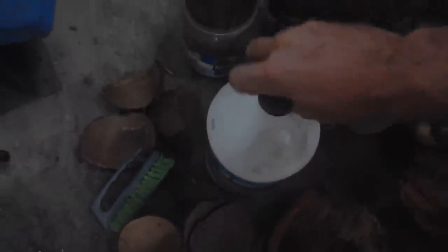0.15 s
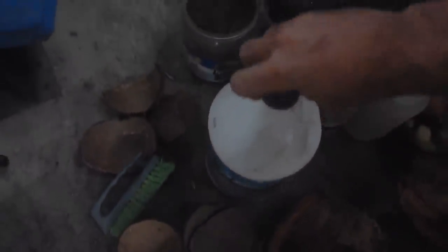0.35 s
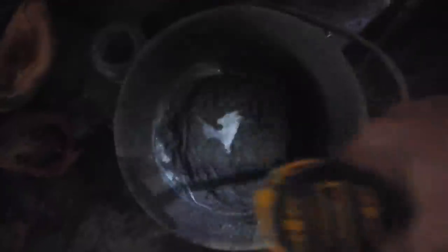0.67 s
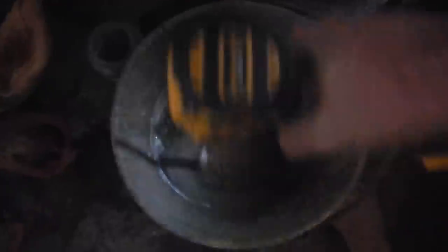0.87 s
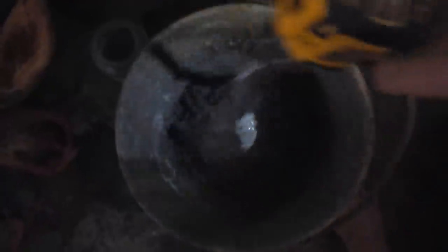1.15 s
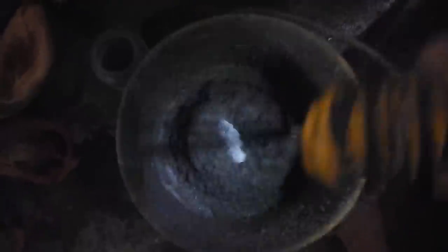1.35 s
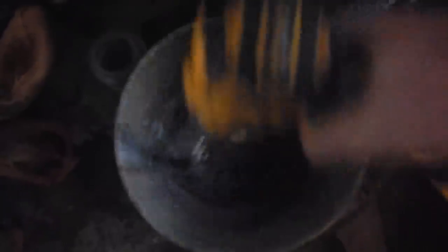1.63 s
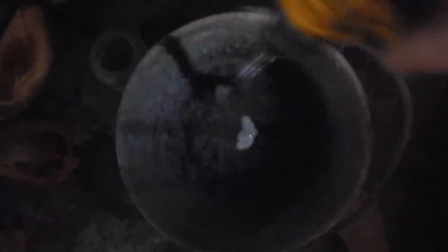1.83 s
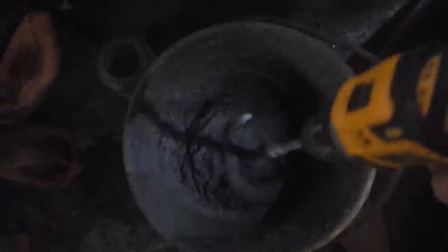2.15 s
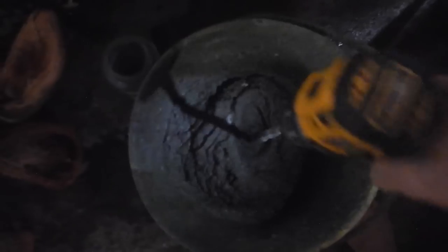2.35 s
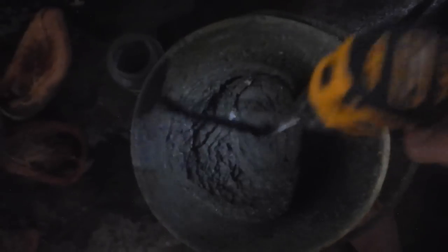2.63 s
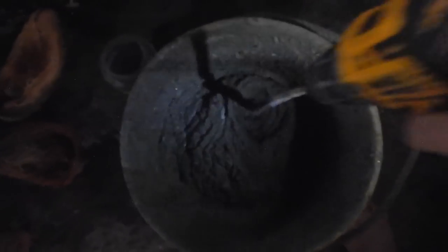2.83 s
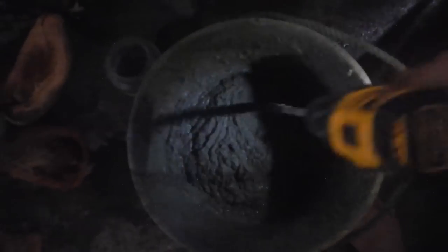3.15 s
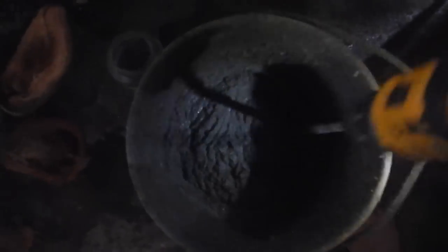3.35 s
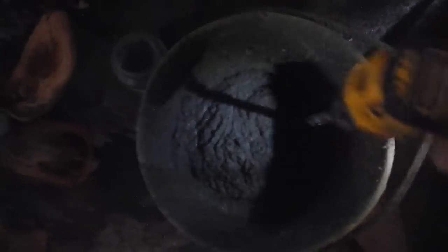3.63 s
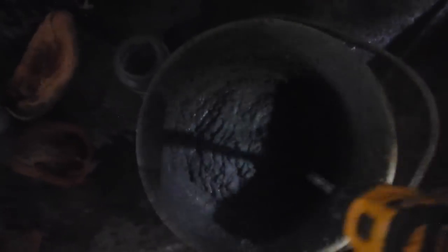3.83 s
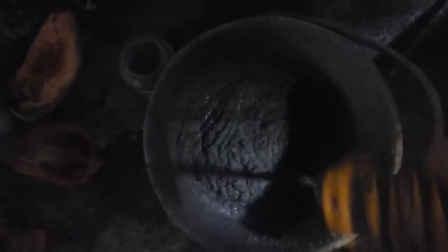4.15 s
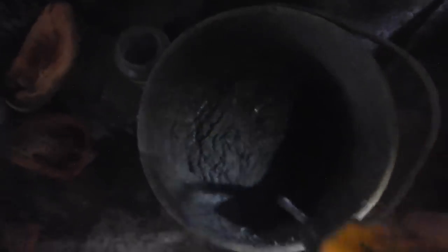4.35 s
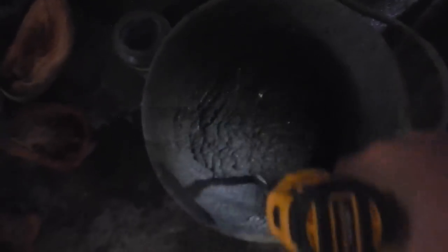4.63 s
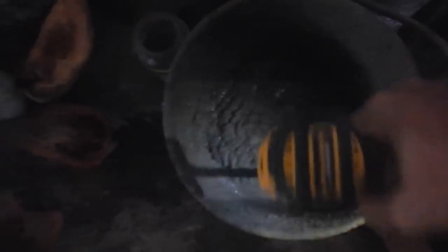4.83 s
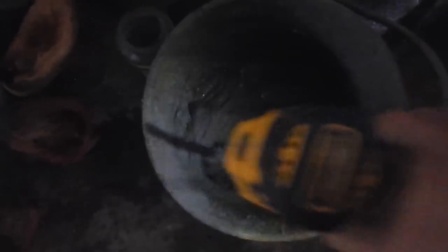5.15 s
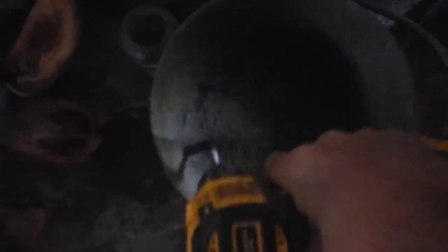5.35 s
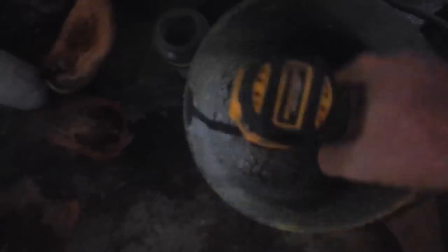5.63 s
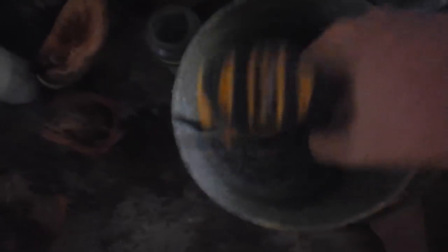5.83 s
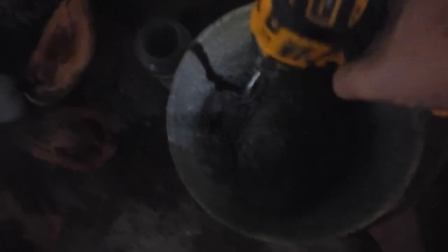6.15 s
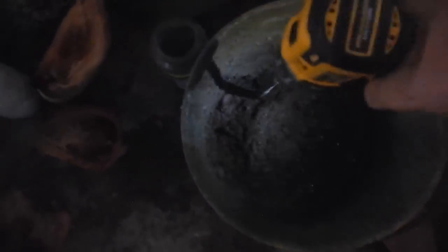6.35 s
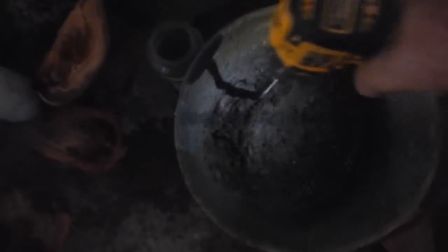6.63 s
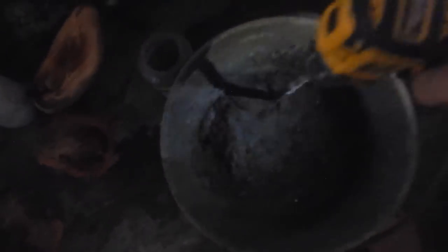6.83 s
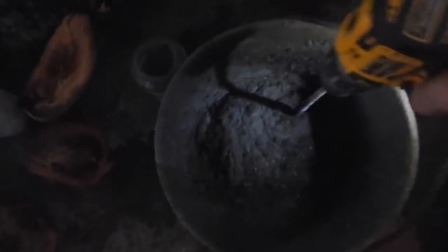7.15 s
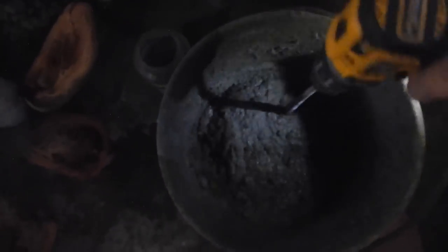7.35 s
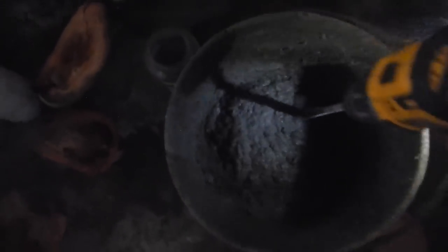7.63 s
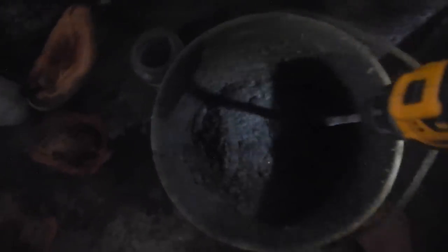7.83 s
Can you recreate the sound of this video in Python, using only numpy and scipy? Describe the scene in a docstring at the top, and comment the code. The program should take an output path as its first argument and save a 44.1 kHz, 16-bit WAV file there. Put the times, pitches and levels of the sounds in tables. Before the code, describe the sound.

Close stereo microphones pick up short, dry plastic knocks over a faint room murmur. Suddenly a power drill fills the sound, a bright, gritty whirr with shifting whines and a thin whistle. A mixing paddle drags through heavy wet mortar, bumping the bucket with dull thuds and smacking lumps. The motor holds its speed, wavers slightly, sags briefly near the end under load, recovers and keeps running.

```python
"""A cordless drill, close by, stirs cement mortar in a bucket: filtered noise is the rush of fan and gears,
sines locked to the rotor whine at a governed speed that hunts and once sags under load.
Random impacts ring the bucket's modes as the paddle churns; swelling noise squelches and slaps.
Before it, in a small workshop's murmur, a plastic cup knocks on a container: clicks ring both sets of modes."""
import sys
import numpy as np
from scipy import signal
from scipy.fft import rfft, irfft
from scipy.io import wavfile
from scipy.ndimage import uniform_filter1d

SR = 44100
rng = np.random.default_rng(int(sys.argv[2]) if len(sys.argv) > 2 else 0)


def master_out(mix):
    """Clip the mix to full scale and print it as 16-bit PCM to the path in sys.argv[1]."""
    frames = np.transpose(np.atleast_2d(mix))
    ceiling = np.clip(frames, -1, 1)
    pcm = np.round(ceiling * 32767).astype(np.int16)
    wavfile.write(sys.argv[1], SR, pcm)


N = 351918
TIME, FREQS = np.arange(N) / SR, np.fft.rfftfreq(N, 1 / SR)


def from_db(db):
    """Decibels to amplitude gain."""
    return 10 ** (np.asarray(db) / 20)


def rms_one(x):
    """Scale to unit power."""
    return x / np.sqrt(np.mean(x ** 2) + 1e-20)


def in_time(rows):
    """Interpolate each column of a time curve at every sample."""
    s, *columns = np.transpose(rows)
    return [np.interp(TIME, s, column) for column in columns]


def over_hz(points):
    """Interpolate a short spectrum on a log-frequency axis."""
    hz, value = np.transpose(points)
    return np.interp(np.log(FREQS + 1), np.log(hz), value)


def drift(rate_hz):
    """Low-passed random signal of rms 1."""
    spectrum = rfft(rng.standard_normal(N)) / (1 + (FREQS / rate_hz) ** 2)
    return rms_one(irfft(spectrum, N))


def panned(pan_db):
    """Left and right gains for a left-right level difference."""
    return from_db(np.array([[1], [-1]]) * pan_db / 2)


def noise(spectrum_db):
    """Coloured stereo noise of rms 1; left-right likeness varies with frequency."""
    # Likeness of the channels: (frequency [Hz], correlation [0-1])
    likeness = [(60, 0.66), (600, 0.96), (1500, 0.97), (3100, 0.88), (7000, 0.79), (15000, 1)]
    mid, side = rfft(rng.standard_normal((2, N)))
    alike = np.clip(over_hz(likeness), 0, 1)
    stereo = np.sqrt(1 + alike) * mid + np.sqrt(1 - alike) * side * [[1], [-1]]
    return rms_one(irfft(from_db(over_hz(spectrum_db)) * stereo, N))


def ring(force, hz, t60_s):
    """Two-pole resonator: a unit click starts a decaying sine of height 1."""
    radius = from_db(-60 / (t60_s * SR))
    angle = 2 * np.pi * hz / SR
    poles = [1, -2 * radius * np.cos(angle), radius * radius]
    return signal.lfilter([0, np.sin(angle)], poles, force + 1e-18)


def clicks(times_s, levels_db):
    """One impulse per event."""
    out = np.zeros(N)
    out[np.round(np.asarray(times_s) * SR).astype(int)] = from_db(levels_db)
    return out


def fade(hits, t60_s, rise_s):
    """Envelope that swells at each hit and dies away; overlapping hits add in power."""
    power = signal.lfilter([1], [1, -from_db(-120 / (t60_s * SR))], hits ** 2 + 1e-18)
    slow = np.exp(-1 / (rise_s * SR))
    return signal.lfilter([1 - slow], [1, -slow], np.sqrt(power))


def low_cut(x, hz):
    """Second-order high-pass, as small objects radiate little bass."""
    return signal.sosfilt(signal.butter(2, hz, "high", fs=SR, output="sos"), x)


def cup():
    """Knocks ring cup and container, duller if soft; the rim cracks, grit scuffs, wall and room answer."""
    # Knocks: (time [s], strength [dB], contact brightness [Hz], ring length [factor on t60],
    # scuff [dB re strength], container [dB re strength])
    knocks = [(0.026, -34.5, 3500, 0.95, 2.5, 14), (0.0433, -31, 3000, 0.84, 4, 17),
              (0.054, -28, 1800, 1.4, -1, 12), (.066, -30, 2500, 1, 4, 8),
              (0.0747, -6, 1700, 1.33, -10.5, -4), (0.1028, -10.5, 1470, 1.1, -10.5, 3),
              (0.2627, -2, 4500, 0.76, -15, -5.5), (0.319, -7.5, 5500, 0.75, -6.5, -4),
              (.5185, -25, 4700, 0.65, 0, 18.5)]
    # Cup modes: (frequency [Hz], relative level [dB], t60 [s])
    cup_modes = [(1425, -4, 0.035), (1625, -2, 0.021), (1830, -0.5, 0.014), (2250, -6.5, 0.0081),
                 (2800, -3, 0.0075), (3560, -11, 0.018), (4800, -6.5, 0.011), (8070, -15, 0.016),
                 (11350, -15, 0.0061)]
    # Modes of the container under it: (frequency [Hz], relative level [dB], t60 [s])
    container_modes = [(127, -22, 0.11), (496, -31, 0.039), (720, -22, 0.061), (955, -14.5, 0.037)]
    # Snap of the plastic: (frequency [Hz], relative density [dB per Hz])
    crack_db = [(800, -14), (1700, 6.5), (2250, 9.5), (2800, -8), (4000, -4), (5600, -6), (7000, -13),
                (8000, -3), (9300, -23), (12000, -21), (15000, -50)]
    # Gritty contact and its echo: (frequency [Hz], relative density [dB per Hz])
    scuff_spectrum_db = [(60, -17), (130, 6), (300, -6), (800, 2), (1200, -7), (1650, 7), (3000, -8.5),
                         (5000, -10.5), (6500, -19), (8200, -16.5), (12000, -36), (15000, -50)]
    knocking, size = np.zeros(N), SR // 4
    for s, level_db, bright_hz, length, _, container_db in knocks:
        soft = np.exp(-2 * np.pi * bright_hz / SR)
        force = from_db(level_db) * (1 - soft) * soft ** np.arange(size)
        at = round(s * SR)
        for modes, gain_db in ((cup_modes, -2.5), (container_modes, container_db - 3.5)):
            # chance: each knock excites each mode differently, 1 dB spread
            strengths = from_db(gain_db + rng.standard_normal(len(modes)))
            for k, (hz, db, t60_s) in enumerate(modes):
                gain = (-1) ** k * strengths[k] * from_db(db)
                knocking[at:at + size] += gain * ring(force, hz, t60_s * length)

    s, level_db, bright_hz, _, scuff_db, _ = np.transpose(knocks)
    hardness_db = 20 * np.log10(bright_hz / bright_hz.max())
    crack_hits = clicks(s - .0005, level_db + hardness_db)
    crack = from_db(-1.5) * fade(crack_hits, t60_s=0.0088, rise_s=0.00068) * noise(crack_db)
    scuff_hits = clicks(s, level_db + scuff_db)
    scuff = from_db(-5) * fade(scuff_hits, t60_s=0.056, rise_s=0.00051) * noise(scuff_spectrum_db)
    room_hits = clicks(s, level_db)
    echo = from_db(-33.5) * fade(room_hits, t60_s=0.32, rise_s=.004) * noise(scuff_spectrum_db)
    wall_delay_s, wall_db = 0.015, -23
    wall = from_db(wall_db) * np.interp(TIME - wall_delay_s, TIME, knocking)
    return low_cut(knocking + crack + scuff + wall + echo, hz=90) * panned(pan_db=0.7)


def room():
    """Steady coloured noise for the room's murmur."""
    # Murmur: (frequency [Hz], relative density [dB per Hz])
    murmur_db = [(20, -20), (52, 8), (85, -3), (260, -0.5), (400, -4.5), (1700, -8), (3000, -16),
                 (3800, -12), (5000, -23.5), (7000, -24.5), (8300, -18.5), (10000, -30), (15000, -37)]
    return from_db(-50.5) * noise(murmur_db)


def motor_turns():
    """Rotor turns so far: integral of governed speed, swings that swell and fade around each hunt, tremor."""
    # Speed, held by the governor except under heavy load: (time [s], speed [turns/s])
    speed_curve = [(6.565, 409.6), (6.585, 381), (6.612, 369), (6.66, 380), (6.75, 378.5), (6.93, 389),
                   (7.11, 388), (7.17, 378), (7.243, 349), (7.3, 383), (7.317, 409.6)]
    # The paddle snags and the governor hunts: (centre [s], swing [turns/s], Gaussian half length [s])
    hunts = [(2.972, -9, .025), (3.454, -5, .025), (3.947, -6, .025), (4.673, 4.5, .12),
             (5.274, -5.5, .025), (5.483, -4, .12), (6.441, -5, .1), (7.462, -7.5, .09)]
    hunt_hz = 17
    speed, = in_time(speed_curve)
    for s, swing, length_s in hunts:
        envelope = np.exp(-((TIME - s) / length_s) ** 2)
        speed = speed + swing * envelope * np.cos(2 * np.pi * hunt_hz * (TIME - s))
    tremor = .75 * drift(rate_hz=28)  # turns/s
    return np.cumsum(speed + tremor) / SR


def tone(turns, order, flutter_db):
    """Sine at a multiple of rotor speed; play in the teeth jitters the angle, so high orders rasp more."""
    jitter_turns = .002 * drift(rate_hz=130)
    cycles = order * (turns + jitter_turns) + rng.random()
    return np.sqrt(2) * np.sin(2 * np.pi * cycles) * from_db(flutter_db * drift(rate_hz=34))


def whine(rows, turns, order, flutter_db):
    """Tone that swells and fades as the hand moves; steadiest at its loudest, fluttering as it fades."""
    rounding_s = 0.037
    level_db = uniform_filter1d(in_time(rows)[0], round(rounding_s * SR))
    unsteady = np.clip(from_db((level_db.mean() - level_db) / 2), 0, 1.2)
    gain = from_db(level_db + .5 * drift(rate_hz=5))
    return gain * tone(turns, order, flutter_db * unsteady)


def whines(turns):
    """Five moving tones of the motor, each at a fixed multiple of rotor speed."""
    # Main whine: (time [s], level [dB])
    main_whine = [(0.7, -36), (1.0, -45), (1.33, -41.5), (1.6, -33), (1.84, -47.5), (2.11, -41),
                  (2.62, -58), (2.71, -40), (3.04, -53), (3.13, -29.5), (3.34, -47.5), (3.67, -37.5),
                  (3.97, -47.5), (4.39, -34.5), (4.63, -43), (5.08, -36), (5.47, -44), (5.92, -36),
                  (6.46, -52), (6.6, -55), (6.73, -37.5), (6.93, -53), (7.09, -55), (7.16, -42),
                  (7.21, -54.5), (7.78, -36), (7.96, -50)]
    # Whine an octave above: (time [s], level [dB])
    high_whine = [(0.7, -55), (0.94, -48), (2.35, -54.5), (2.44, -38.5), (2.86, -58), (3.04, -35),
                  (3.19, -56), (3.58, -38), (3.7, -49), (4.24, -45.5), (4.36, -68), (4.63, -42.5),
                  (5.2, -47.5), (5.32, -36), (5.5, -50.0), (5.74, -37.0), (5.92, -41.5), (6.01, -61),
                  (6.49, -37), (6.64, -51), (7.09, -55.0), (7.36, -38.5), (7.51, -46), (7.96, -46.5)]
    # Thin top whistle: (time [s], level [dB])
    whistle = [(0.7, -60), (0.88, -67), (1.24, -41.5), (1.51, -57), (1.93, -44.5), (2.86, -46.5),
               (3.28, -53), (3.4, -40.5), (3.55, -59), (3.73, -46.5), (4.15, -61), (4.36, -41.5),
               (4.63, -55.5), (5.95, -55.0), (6.43, -48), (7.06, -56), (7.18, -43.5), (7.96, -42)]
    # Rotor drone: (time [s], level [dB])
    drone = [(0.7, -52.5), (2.56, -55), (4.42, -53), (4.9, -66.0), (5.11, -51.5), (6.52, -53),
             (6.64, -66.0), (6.79, -53.5), (7.21, -57), (7.96, -48)]
    # Lower octave of the drone: (time [s], level [dB])
    low_drone = [(0.7, -64), (2.92, -62.5), (2.95, -68), (6.1, -65), (7.42, -76), (7.96, -63.5)]
    # Per tone, in that sequence: (multiple of rotor speed)
    orders = (8, 16.04, 23, 4, 2)
    # Per tone: (flutter spread at mean level [dB])
    flutters_db = (2, 3.6, 2.8, 0.89, 1.2)
    # Per tone: (left-right offset from the drill's position [dB])
    pans_db = (-.5, -1, 0.32, 0, 0)
    levels = (main_whine, high_whine, whistle, drone, low_drone)
    return sum(whine(level, turns, order, flutter_db) * panned(pan_db)
               for level, order, flutter_db, pan_db in zip(levels, orders, flutters_db, pans_db))


def hum(turns):
    """Weaker tones of rotor and gears at fixed mean levels."""
    # Per tone: (multiple of rotor speed)
    orders = (1, 4.6, 7, 9, 10.58, 11.3, 14.8)
    # Per tone: (level [dB])
    levels_db = (-80.5, -62.5, -64, -77, -72, -62, -73)
    return sum(from_db(db) * tone(turns, order, flutter_db=4.8)
               for order, db in zip(orders, levels_db))


def bucket_echo(x, delay_s, sway, share):
    """The bucket returns the sound over a path that shifts as the drill moves: a changing hollow colour."""
    late_s = TIME - delay_s * (1 + sway * np.tanh(drift(rate_hz=0.96)))
    echo = np.array([np.interp(late_s, TIME, channel) for channel in x])
    return rms_one(x + share * echo)


def rush(turns, body_db, hiss_db):
    """Fan and gear noise in two bands, throbbing slightly with each paddle turn."""
    # Body: (frequency [Hz], relative density [dB per Hz])
    body_spectrum_db = [(40, -27.5), (120, -51), (400, -24.5), (700, -17.5), (950, -7), (1100, -11),
                        (1500, -4.5), (1900, 1.15), (2250, 0.1), (2900, 2), (3750, 3.5), (4300, -3.5),
                        (5500, -4.5), (8000, -30)]
    # Hiss: (frequency [Hz], relative density [dB per Hz])
    hiss_spectrum_db = [(1000, -45), (2500, -16), (4600, -0.5), (5500, 0), (6500, 6.5), (8100, 6.5),
                        (9000, 0), (9700, -1), (10300, -8.5), (11700, -10.5), (14000, -27), (16000, -44)]
    rotor_turns_per_paddle_turn = 22.5
    paddle_turn = np.sin(2 * np.pi * turns / rotor_turns_per_paddle_turn)
    throb = from_db(.3 * paddle_turn + .5 * drift(rate_hz=40))
    body = bucket_echo(noise(body_spectrum_db), delay_s=0.001995, sway=0.28, share=0.18)
    hiss = noise(hiss_spectrum_db)
    return throb * (from_db(body_db) * body + from_db(hiss_db) * hiss)


def drill():
    """Tones locked to the rotor over the rush of fan and gears, moving together in the stereo image."""
    # Body of the rush, used about its mean: (time [s], level [dB])
    body_level = [(0.7, -42), (0.98, -41.5), (1.25, -43), (1.71, -41), (1.85, -43), (2.41, -43),
                  (3.85, -44.5), (3.91, -43), (5.81, -42), (6.8, -45), (7.28, -43.5), (7.32, -41),
                  (7.75, -43.5), (7.95, -43)]
    # Hiss and drill position, each used about its mean: (time [s], level [dB], left-right [dB])
    hiss_level = [(0.7, -50, -1.5), (0.98, -46, -1), (1.55, -49, -2.5), (1.67, -46, -0.5), (2.13, -48, -3),
                  (2.5, -46.5, -2.5), (4.23, -48.5, -3), (5.44, -48.5, -1.5), (5.89, -47.5, -2),
                  (6.09, -47.5, -1.5), (6.45, -45, -2.5), (6.58, -49.5, -1.5), (7.16, -45.5, -2.5),
                  (7.5, -42, -2.5), (7.56, -46.5, -2.5), (7.95, -45, -3.5)]
    body_mean_db, hiss_mean_db = -38, -42
    columns = in_time(body_level) + in_time(hiss_level)
    body_db, hiss_db, pan_db = [column - column.mean() for column in columns]
    turns = motor_turns()
    noise_part = rush(turns, body_mean_db + body_db, hiss_mean_db + hiss_db)
    return (whines(turns) + hum(turns) + noise_part) * panned(pan_db)


def bucket(force):
    """Impacts ring the low modes of the loaded bucket."""
    # Bucket with mortar: (frequency [Hz], relative level [dB], t60 [s])
    bucket_modes = [(258, -23, 0.2), (290.4, 5.5, 0.091), (345, -33, .05), (413, -4, 0.036),
                    (484, -8, 0.022)]
    return low_cut(sum(from_db(db) * ring(force, hz, t60_s) for hz, db, t60_s in bucket_modes), hz=213)


def base(force):
    """The bucket's base gives a short dull thump: one damped mode."""
    return low_cut(ring(force, hz=137, t60_s=0.043), hz=85)


def lumps(per_s):
    """Small impacts at random times with random strength and sign."""
    return (rng.random(N) < per_s / SR) * rng.standard_normal(N)


def churning():
    """Gains of tumbling and squelch: steady stir plus a Gaussian swell for each heap."""
    # The paddle ploughs through heaps: (peak [s], half length [s], added tumbling [dB], added squelch [dB])
    churns = [(.9, 0.34, -61, -71), (1.363, 0.065, -60.5, -66), (1.684, .2, -61.5, -71),
              (2.53, 0.094, -71, -69), (3.393, 0.09, -62, -61.5), (3.862, 0.28, -84, -75),
              (4.563, 0.077, -61, -67), (5.19, 0.13, -62.5, -73), (6.127, 0.25, -63.5, -71),
              (7.036, 0.089, -59, -60), (7.435, 0.043, -56, -54), (7.95, 0.076, -60, -68)]
    steady_tumble_db, steady_squelch_db = -77.5, -73
    s, length_s, tumble_db, squelch_db = np.transpose(churns)
    heaps = np.exp(-((TIME - s[:, None]) / length_s[:, None]) ** 2)
    tumbling = from_db(steady_tumble_db) + from_db(tumble_db) @ heaps
    squelching = from_db(steady_squelch_db) + from_db(squelch_db) @ heaps
    return tumbling, squelching


def pockets():
    """Air pockets burst in the mix, each ringing briefly at one of nine pitches."""
    ring_cycles = 13  # t60 in cycles
    pitches_hz = np.geomspace(215, 560, 9)
    bursts = sum(ring(lumps(per_s=14), hz, ring_cycles / hz) * hz for hz in pitches_hz)
    return rms_one(low_cut(bursts, hz=210))


def slaps():
    """Big lumps slap the bucket: a wet noise smack, then a modal thud and a thump of the base 2 ms later."""
    # Slaps: (time [s], thud [dB], wet smack [dB], thump of the base [dB])
    slap_events = [(.819, -47.5, -55, -70), (.884, -48.5, -59, -70), (1.242, -59, -39.5, -72),
                   (1.333, -54, -37.5, -70), (1.494, -55, -42, -72), (1.543, -40, -37.5, -60),
                   (1.605, -65, -46, -56), (1.639, -45.5, -61, -65), (1.862, -53.5, -55, -72),
                   (2.004, -56, -39.5, -65), (3.294, -49, -57, -51), (3.346, -52, -57, -64),
                   (3.431, -52, -52, -68), (4.439, -65, -48, -68), (5.742, -57.5, -41, -54),
                   (6.18, -53, -40, -75), (7.085, -65, -40.5, -72), (7.386, -57, -54, -54),
                   (7.403, -47.5, -43, -47)]
    # Wet smack: (frequency [Hz], relative density [dB per Hz])
    smack_spectrum_db = [(60, -45), (200, -39), (550, -6.5), (780, 6.5), (1000, 4.5), (1300, 0.5),
                         (3000, -14), (9000, -50)]
    s, thud_db, smack_db, thump_db = np.transpose(slap_events)
    thuds = bucket(clicks(s + .002, thud_db)) + base(clicks(s + .002, thump_db))
    smacks = fade(clicks(s, smack_db), t60_s=0.057, rise_s=0.001) * noise(smack_spectrum_db)
    return thuds + smacks


def mortar():
    """Small lumps tumble in clumps, the mix squelches and pops, the base bumps, big lumps slap."""
    # Wet mix dragged along the wall: (frequency [Hz], relative density [dB per Hz])
    squelch_spectrum_db = [(80, -26), (180, -15), (250, -2), (360, -17), (490, 5.5), (600, -1), (1200, 4),
                           (4000, -34)]
    bump_db, pocket_db = -83, -5.5  # pockets relative to the squelch
    tumbling, squelching = churning()
    clumps = lumps(per_s=250) * from_db(4 * drift(rate_hz=18))
    tumble = tumbling * rms_one(bucket(clumps))
    drag = from_db(1.9 * drift(rate_hz=55)) * noise(squelch_spectrum_db)
    squelch = squelching * (drag + from_db(pocket_db) * pockets())
    bumps = from_db(bump_db) * rms_one(base(lumps(per_s=110)))
    return tumble + squelch + bumps + slaps()


def scene():
    """Knocks over the room's murmur, then a 2 ms crossfade to drill and mortar."""
    drill_on_s = .667
    running = np.clip((TIME - drill_on_s) / 0.002, 0, 1)
    before = cup() + room()
    return (1 - running) * before + running * (drill() + mortar())


def record(dry):
    """Two close microphones: level and phase differ by frequency; notches, low cut, clipping, top cut."""
    # Stereo balance: (frequency [Hz], left-right [dB])
    balance = [(60, 3), (700, 3.5), (1300, 3.5), (2400, 1.5), (4400, -4), (8100, 0), (15000, 1.5)]
    # Phase by which the left leads, negative if late: (frequency [Hz], phase [rad])
    phase_lead = [(200, 0.48), (1500, -.15), (2400, -.55), (4100, -0.67), (5200, -0.15), (6800, -0.77),
                  (8200, -1.3), (9400, -0.2), (10500, 1), (15000, -0.59)]
    # Narrow notches: (frequency [Hz], width [Hz])
    notches = [(2490, 170), (2515, 170), (5000, 70), (6000, 35), (7000, 35), (8000, 35), (9000, 35),
               (10000, 45), (11000, 30)]
    ceiling, cutoff_hz = .85, 15800
    lead = np.exp(1j * over_hz(phase_lead) * np.array([[1], [-1]]) / 2)
    out = irfft(rfft(dry) * panned(over_hz(balance)) * lead, N)
    for hz, width_hz in notches:
        out = signal.lfilter(*signal.iirnotch(hz, hz / width_hz, fs=SR), out)
    clipped = np.clip(low_cut(out, hz=35), -ceiling, ceiling)
    top_cut = signal.ellip(10, .1, 80, cutoff_hz, fs=SR, output="sos")
    return signal.sosfilt(top_cut, clipped)


dry = scene()
out = record(dry)
master_out(out)
```